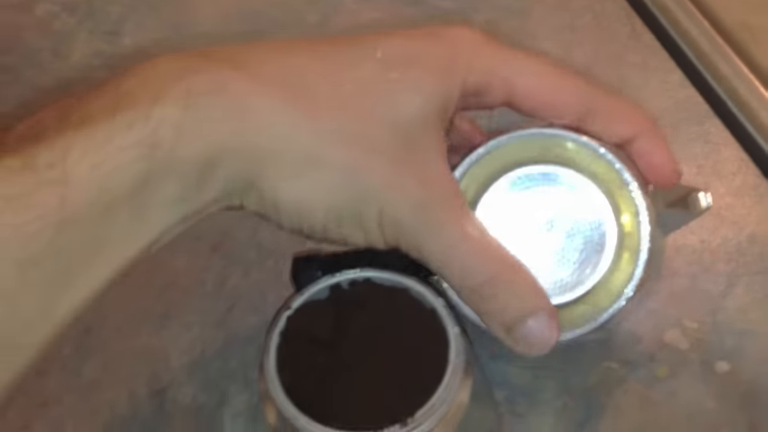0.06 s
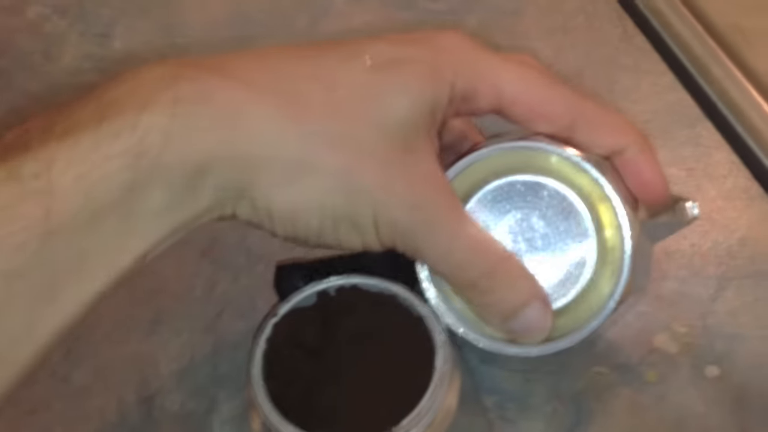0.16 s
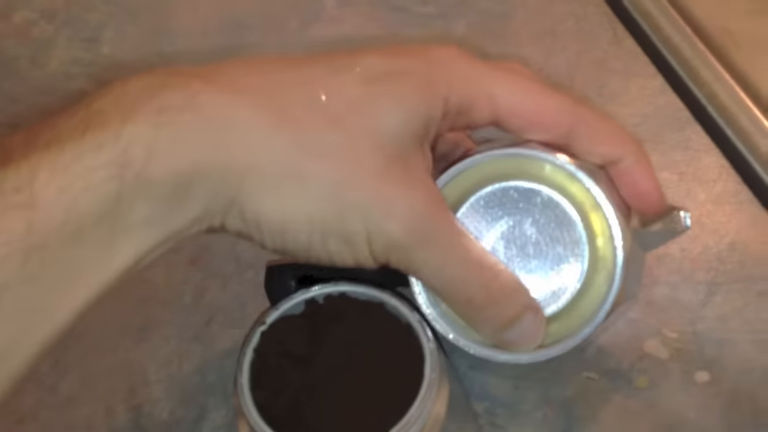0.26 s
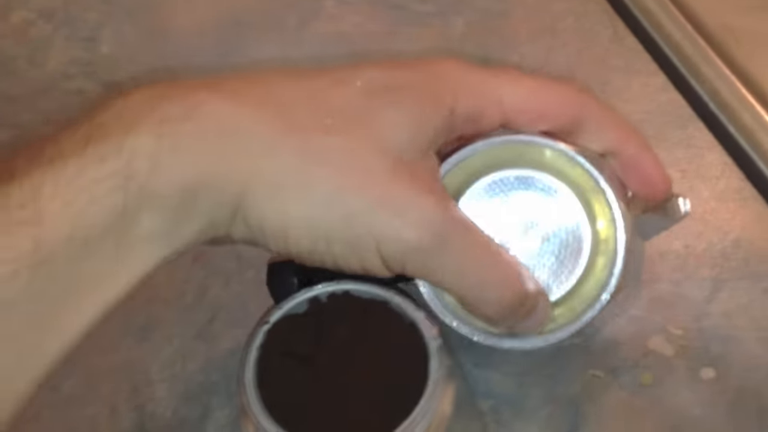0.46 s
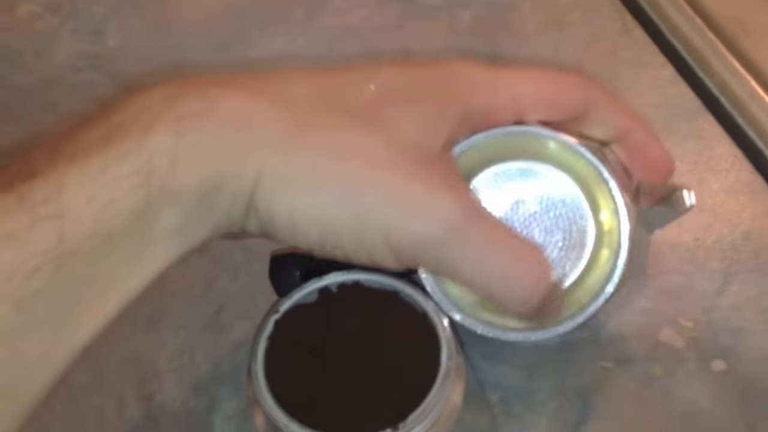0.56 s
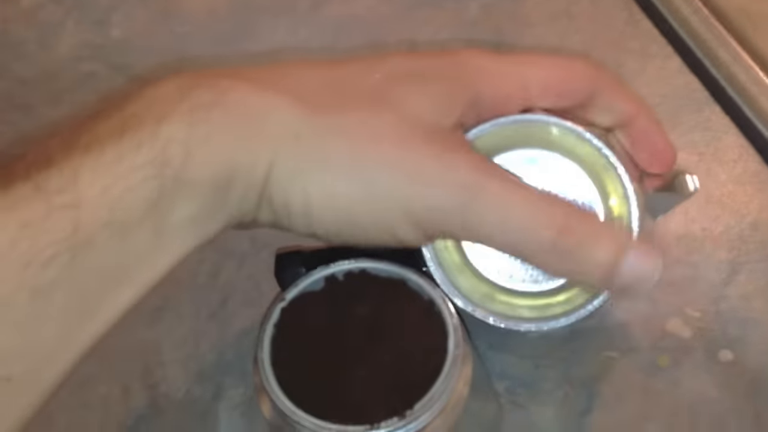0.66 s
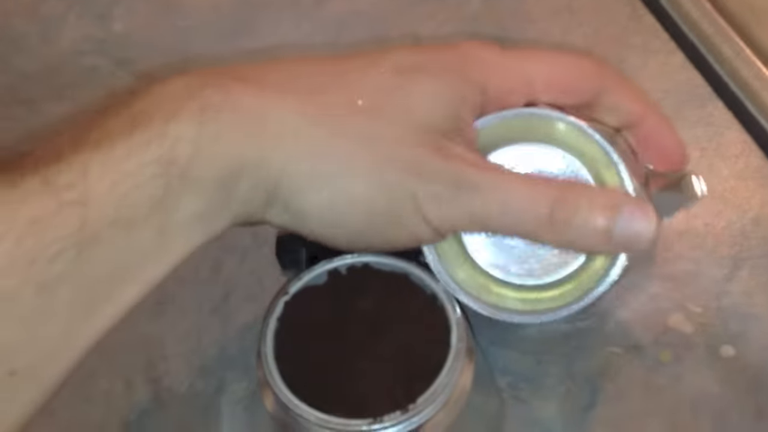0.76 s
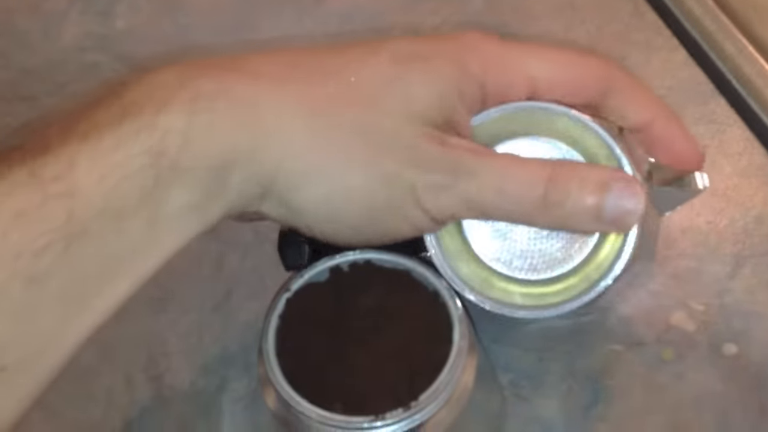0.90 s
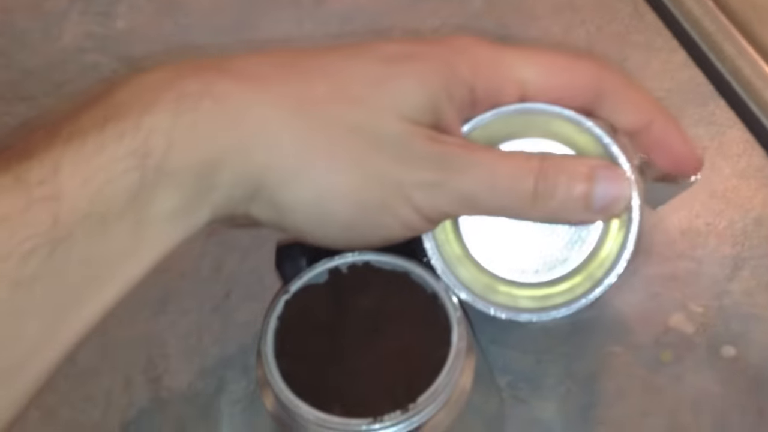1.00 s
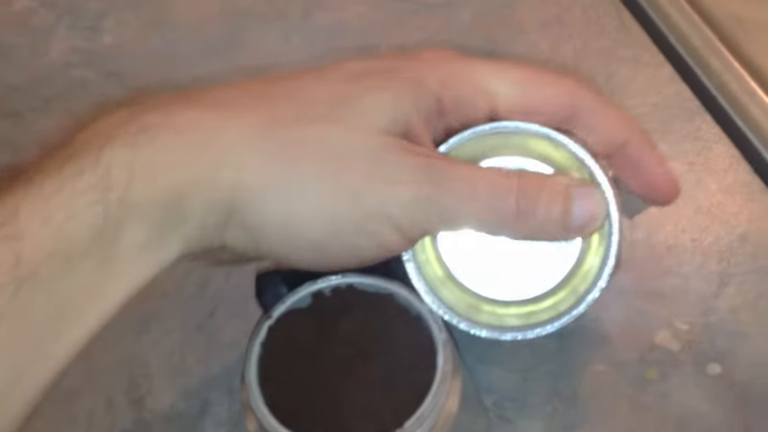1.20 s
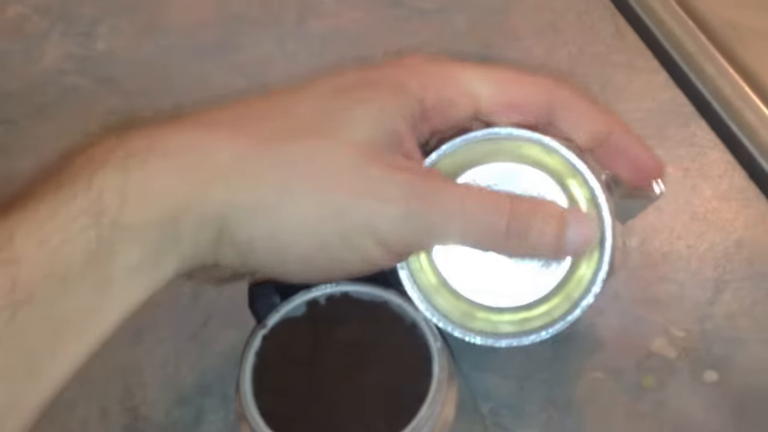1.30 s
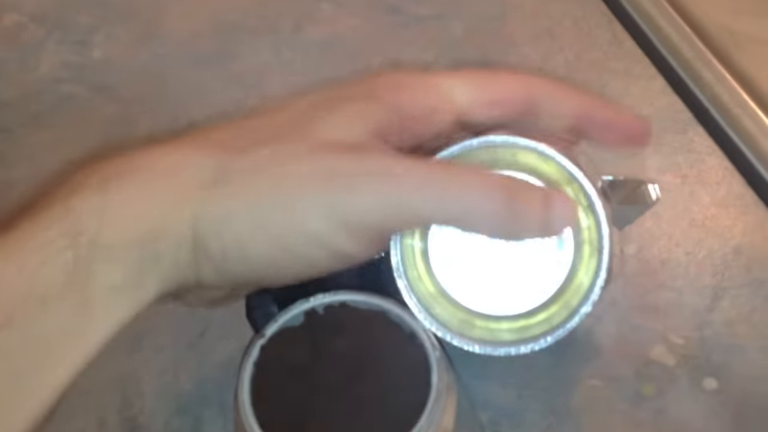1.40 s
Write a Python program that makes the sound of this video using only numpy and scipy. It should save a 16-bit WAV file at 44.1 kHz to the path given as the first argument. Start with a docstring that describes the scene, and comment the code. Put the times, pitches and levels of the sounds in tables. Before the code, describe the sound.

A metal coffee pot base clinks and knocks on a kitchen countertop.

```python
"""A small kitchen with a steady hush of air. A hand turns the metal base of a stovetop coffee pot
on the counter: it ticks and scrapes, its rim clinks against the other half, its body knocks, its foot
clacks down and the worktop thumps underneath. Each contact is a tight burst of dense metal modes;
a few leave a pitched ring, which the hand damps. The room answers with a short tail."""
import sys
import numpy as np
from scipy import signal
from scipy.fft import rfft, irfft, next_fast_len
from scipy.io import wavfile
from scipy.ndimage import uniform_filter1d, map_coordinates

SR = 44100
rng = np.random.default_rng(int(sys.argv[2]) if len(sys.argv) > 2 else 0)


def wrap_up_sound(samples):
    """Save the sound to the file named by the first command line argument, as 16-bit audio."""
    columns = np.atleast_2d(samples).T
    # keep every value between -1 and 1, then stretch to whole-number steps
    tamed = np.clip(columns, -1, 1)
    steps = np.round(tamed * 32767).astype(np.int16)
    wavfile.write(sys.argv[1], SR, steps)


N = 63945
T = np.arange(SR // 2) / SR  # time axis of one hit, s


def amp(db):
    """Decibels to gain."""
    return 10 ** (np.asarray(db) / 20)


def along(points, hz):
    """Read a curve of (f/Hz, value) breakpoints on a log frequency axis."""
    freqs, values = np.transpose(points)
    return np.interp(np.log(hz + 1), np.log(freqs + 1), values)


def add(track, s, sound):
    """Mix a sound in at s seconds."""
    part = track[int(s * SR):][:len(sound)]
    part += sound[:len(part)]


def fade(t60):
    """Decay envelope that falls 60 dB in t60 seconds."""
    return amp(-60 * T / t60)


def coloured(x, colour_db, size=4096):
    """Minimum-phase EQ of unit energy; colour_db maps Hz to dB."""
    cepstrum = irfft(np.log(amp(colour_db(np.fft.rfftfreq(size, 1 / SR)))))
    cepstrum[1:size // 2] *= 2
    cepstrum[size // 2 + 1:] = 0
    impulse = irfft(np.exp(rfft(cepstrum)))
    return signal.fftconvolve(x, impulse / np.linalg.norm(impulse))[:len(x)]


def evened(x, smooth_bins=150):
    """Flatten a burst's spectrum, keeping its energy."""
    freqs = np.fft.rfftfreq(len(x), 1 / SR)
    power = np.abs(uniform_filter1d(np.abs(rfft(x)) ** 2, smooth_bins))
    flat = coloured(x, lambda hz: -10 * np.log10(np.interp(hz, freqs, power) + 1e-12))
    return flat * np.linalg.norm(x) / np.linalg.norm(flat)


def dying_noise(t60_of, size=128):
    """Noise standing for countless close modes, each frequency dying at its own speed."""
    hz, t, spectra = signal.stft(rng.standard_normal(len(T)), SR, nperseg=size)
    decay = amp(-60 * t / t60_of(hz)[:, None])
    return signal.istft(spectra * decay, SR, nperseg=size)[1][:len(T)]


def ring(modes, scatter_db=1.4, attack_s=0.0025):
    """Damped metal modes, their balance and phase new at each blow."""
    out = np.zeros(len(T))
    for hz, db, t60 in modes:
        gain = amp(db + scatter_db * rng.normal())
        out += gain * fade(t60) * np.sin(2 * np.pi * (hz * T + rng.random()))
    return out * (1 - np.exp(-T / attack_s))


def contacts(hits, colour, treble_damping=0.052, peak_octaves=0.19):
    """Bursts of dense, hand-damped metal modes, each with its own tilt and resonant peak."""
    out = np.zeros(N)
    for s, db, tilt_db, t60, peak_hz, peak_db in hits:
        decay_s = lambda hz: t60 * (np.maximum(hz, 500) / 2000) ** -treble_damping
        tilt = lambda hz: tilt_db * np.log2(np.maximum(hz, 400))
        peak = lambda hz: peak_db * np.exp(-(np.log2((hz + 1) / peak_hz) / peak_octaves) ** 2)
        burst = evened(dying_noise(decay_s))
        add(out, s, amp(db) * coloured(burst, lambda hz: along(colour, hz) + tilt(hz) + peak(hz)))
    return out


# EQ of the room tone: f/Hz, level/dB
AIR_EQ = [(30, -51), (70, -26), (110, -13), (175, -0.5), (260, -3.5), (390, 0), (470, -2), (620, -11),
          (900, -12), (1350, -10.5), (1600, -11), (2150, -7), (2680, -11.5), (3000, -19), (4500, -22),
          (8000, -25), (15000, -28.5)]
def air(level_db=-56, waver_db=0.14, waver_hz=14):
    """A dark bed of room noise whose level barely wavers."""
    waver = map_coordinates(rng.standard_normal(N), [np.arange(N) * waver_hz / SR], order=1)
    hush = coloured(rng.standard_normal(N), lambda hz: along(AIR_EQ, hz))
    return amp(level_db + waver_db * waver) * hush


# reverb time of the kitchen: f/Hz, t60/s
ROOM_DECAY = [(100, 0.1), (400, 0.28), (2000, .3), (6000, .28), (15000, 0.097)]
# EQ of its tail: f/Hz, level/dB
ROOM_EQ = [(100, -16), (200, -14), (320, 0.5), (450, -13.5), (700, -9), (2000, -13.5), (3500, -12.5),
           (6500, -14.5), (10000, -12), (15000, -16)]
def kitchen(send, predelay_s=0.008):
    """The small room's diffuse reflections: a short, boxy tail, wet only."""
    tail = evened(dying_noise(lambda hz: along(ROOM_DECAY, hz)))
    eq = amp(along(ROOM_EQ, np.fft.rfftfreq(len(T), 1 / SR)))
    tail = irfft(rfft(tail / np.linalg.norm(tail)) * eq)
    impulse = np.pad(tail[:len(T) // 2], (int(predelay_s * SR), 0))
    return signal.fftconvolve(send, impulse)[:N]


# thumps under the pot: t/s, deep level/dB, deep f/Hz, hollow level/dB, hollow f/Hz, attack/s, t60/s
WORKTOP_THUMPS = [(0.125, -59, 187, -41, 396, 0.0026, 0.052), (0.2113, -45, 185, -11.5, 433, 0.0023, 0.039),
                  (0.221, -24, 187.4, -31, 363.5, 0.0057, 0.12),
                  (0.402, -21, 198.7, -32.5, 338, 0.005, 0.088), (0.5621, -24, 196, -22, 449, 0.0025, 0.08),
                  (.587, -31, 196, -29, 468, 0.001, 0.075), (.835, -43, 207, -38.5, 394, 0.0018, 0.054),
                  (.846, -28.5, 214, -30, 414, 0.0029, 0.091), (.859, -54, 202, -35, 454, 0.0019, 0.068),
                  (.990, -28, 192.5, -49, 403, 0.012, 0.056),
                  (1.115, -46.5, 214, -36.5, 400.5, 0.0019, 0.064),
                  (1.243, -27.5, 210, -39, 415, 0.0081, 0.053),
                  (1.365, -50.5, 184.5, -42, 491, 0.00057, 0.069)]
def worktop():
    """The low end: each push of the pot rings a deep and a hollow resonance of the worktop."""
    out = np.zeros(N)
    for s, deep_db, deep_hz, hollow_db, hollow_hz, attack, t60 in WORKTOP_THUMPS:
        deep = amp(deep_db) * np.sin(2 * np.pi * deep_hz * T)
        hollow = amp(hollow_db) * np.sin(2 * np.pi * hollow_hz * T)
        add(out, s, (deep + hollow) * fade(t60) * (1 - np.exp(-T / attack)))
    return out


# modes of the pot's wall: f/Hz, level/dB, t60/s
WALL_MODES = [(523, -4, 0.084), (671, -5.5, .1), (784, 1, 0.14), (818, -15, 0.21), (1027.5, 8, 0.091),
              (1115, -3, 0.13), (1234, -10, 0.34), (1397, 4.5, 0.11), (1464, 5.5, 0.08), (2144, -3, 0.076),
              (3293, 1, 0.074), (4030, -6, 0.11), (3764, -2.5, 0.17), (5720, -12, 0.12)]
# blows that set it ringing: t/s, level/dB
WALL_HITS = [(0.2116, -36.5), (0.56, -56.5), (1.111, -60)]
def wall_ring():
    """The metal wall rings on briefly behind a few of the knocks."""
    out = np.zeros(N)
    for s, db in WALL_HITS:
        add(out, s, amp(db) * ring(WALL_MODES))
    return out


# knocks of the body: t/s, level/dB, tilt/(dB per octave), t60/s, peak f/Hz, peak boost/dB
KNOCK_HITS = [(.123, -49.5, -1.5, 0.08, 470, 6.2), (.2114, -20.5, 1.5, 0.038, 1450, 3),
              (.228, -34.5, -2, 0.1, 770, 5), (.5606, -31.5, -3, 0.075, 580, 10.6),
              (.847, -44, 0.5, .06, 490, 11), (.856, -46, -1.6, 0.11, 520, 13),
              (1.116, -47.5, -0.5, 0.065, 3660, 11), (1.241, -53, -6.5, 0.032, 450, 4.5),
              (1.3655, -41.5, -2, 0.053, 990, 4)]
# EQ of a knock: f/Hz, level/dB
KNOCK_EQ = [(50, -53), (120, -22), (250, -12.5), (420, 0.5), (600, -0.5), (800, -1.5), (1480, -1.5),
            (1650, -14.5), (2100, -6), (3300, -7), (4400, -13), (5100, -14.5), (9000, -23), (15000, -24.5)]
def body_knocks():
    """The pot's body knocks as it turns: midrange hits, choked by the hand."""
    return contacts(KNOCK_HITS, KNOCK_EQ)


# the foot landing: t/s, level/dB, tilt/(dB per octave), t60/s, peak f/Hz, peak boost/dB
CLACK_HITS = [(.397, -32.5, -6, .03, 2180, 2.5), (0.4007, -19, -0.55, 0.03, 2250, 1.1)]
# EQ of a clack: f/Hz, level/dB
CLACK_EQ = [(30, -22), (300, -2), (650, -9.5), (1000, -5), (1450, 2.5), (1620, -14), (1850, 0.5),
            (2400, -2), (2850, -11.5), (3100, -2), (3400, -9), (4150, -11.5), (4600, -0.5), (5200, -12.5),
            (5650, -4), (6000, -16), (6400, -2.5), (6800, -13), (7800, -13), (8300, -30), (10300, -10),
            (12300, -28.5), (14200, -18), (15500, -34)]
# modes of the foot: f/Hz, level/dB, t60/s
FOOT_MODES = [(1280, -4, 0.15), (1417, 8, 0.12), (2326, -6, 0.18), (3550, -9, 0.31), (4344, -9, 0.38),
              (4820, 3, 0.13), (5250, -3, .12), (6330, -8, 0.16), (7400, -12, 0.26), (7800, -15, 0.24)]
def foot_clacks(ring_db=-21.5):
    """The foot is set down hard: a tight double transient with a faint metal ring."""
    out = contacts(CLACK_HITS, CLACK_EQ)
    for s, db, *_ in CLACK_HITS:
        add(out, s, amp(db + ring_db) * ring(FOOT_MODES))
    return out


# ticks, scrape grit and wall ring: t/s, level/dB, tilt/(dB per octave), t60/s, peak f/Hz, peak boost/dB
BRIGHT_HITS = [(.053, -48, 0.5, 0.048, 4480, 4), (.2022, -27, -5, 0.027, 1990, 2),
               (.2041, -21.5, 5, .007, 7300, 5.5), (.2092, -34.5, -1.5, 0.062, 10200, 8),
               (.5622, -45.5, -4.5, 0.041, 4870, 18), (.853, -53.5, -6.5, 0.11, 4300, 9),
               (.9403, -52, 14, 0.016, 9000, 10), (1.1125, -34.5, -10.5, 0.029, 1910, 10),
               (1.311, -56, -6, 0.045, 2600, 11), (1.3655, -55, 5, .03, 4900, 7)]
# their EQ: f/Hz, level/dB
BRIGHT_EQ = [(300, -27), (1600, -12.5), (1950, 5), (3000, -2), (4500, -7.5), (6000, -6.5), (7300, -6.5),
             (9500, -16.5), (10400, -12), (12200, -30), (13500, -14), (15500, -30)]
def bright_metal():
    """Small, crisp metal ticks, a brief gritty scrape, and the wall's bright ring atop two knocks."""
    return contacts(BRIGHT_HITS, BRIGHT_EQ)


# the rim's close modes: f/Hz, level/dB, t60/s
RIM_MODES = [(2600, -1, .085), (2634, 0, .125), (2708, -8, .11)]
# clinks, retuned and damped by the grip: t/s, level/dB, pitch ratio, decay ratio, attack/s
CLINK_HITS = [(0.214, -25, 1, 0.98, 0.0082), (1.1129, -34, 1.02, .45, 0.009),
              (1.3652, -42, 1.05, .85, 0.0038)]
def rim_clinks():
    """The rim's close modes swell, beat and die quickly under the fingers."""
    out = np.zeros(N)
    for s, db, pitch, length, attack in CLINK_HITS:
        beating = sum(amp(level) * fade(t60 * length) * np.sin(2 * np.pi * hz * pitch * T)
                      for hz, level, t60 in RIM_MODES)
        add(out, s, amp(db) * (1 - np.exp(-T / attack)) * beating)
    return out


def scene(thump_send_db=-2, clink_send_db=-9):
    """Mono mix of pot, worktop, reverb and room tone; thumps and clinks get lower reverb sends."""
    pot = bright_metal() + body_knocks() + foot_clacks() + wall_ring()
    thumps, clinks = worktop(), rim_clinks()
    reverb = kitchen(pot + amp(thump_send_db) * thumps + amp(clink_send_db) * clinks)
    return (pot + thumps + clinks + reverb + air())[None]


def record(dry, low_cut_hz=120, top_hz=15500):
    """The small microphone rolls off the bass and keeps nothing above its band limit."""
    thin = signal.sosfilt(signal.butter(2, low_cut_hz, 'high', fs=SR, output='sos'), dry)
    size = next_fast_len(N + SR // 2)
    passband = np.fft.rfftfreq(size, 1 / SR) < top_hz
    return irfft(rfft(thin, size) * passband, size)[..., :N]


dry = scene()
out = record(dry)
wrap_up_sound(out)
```